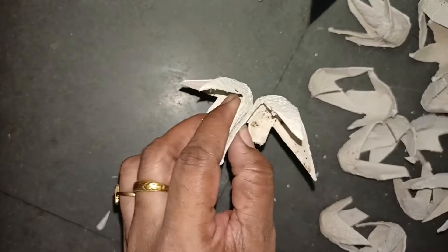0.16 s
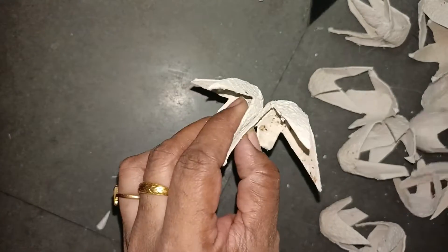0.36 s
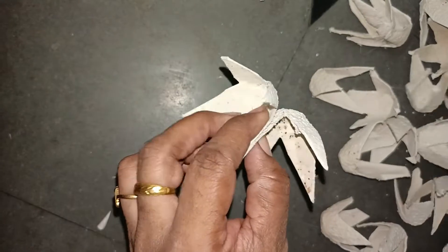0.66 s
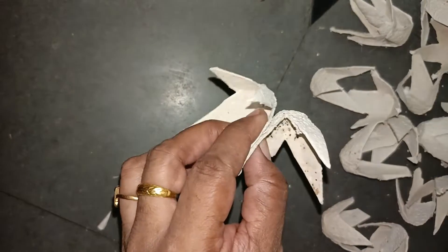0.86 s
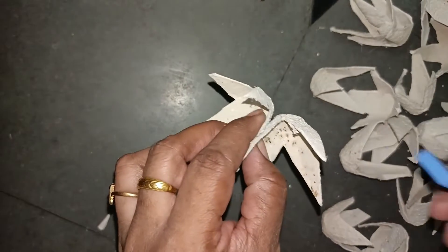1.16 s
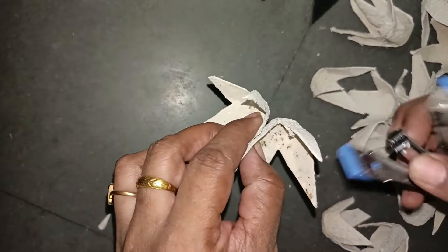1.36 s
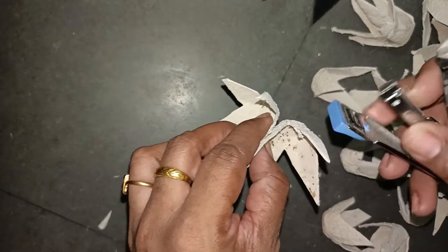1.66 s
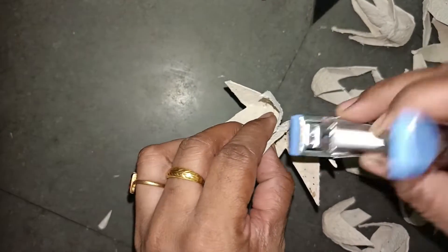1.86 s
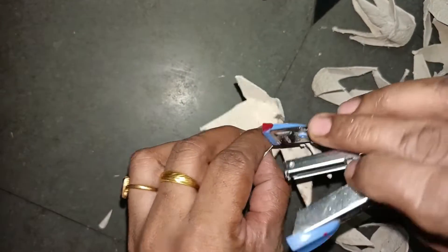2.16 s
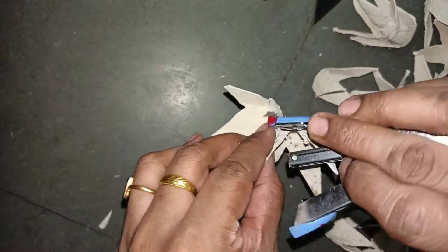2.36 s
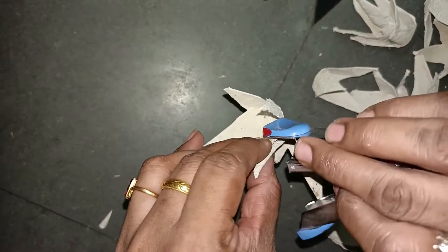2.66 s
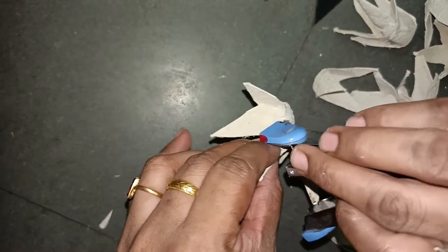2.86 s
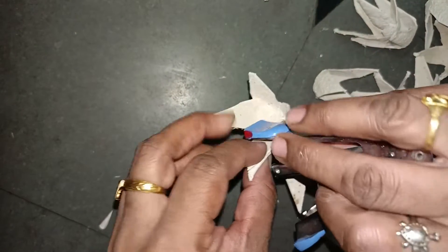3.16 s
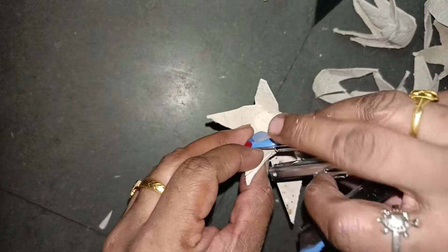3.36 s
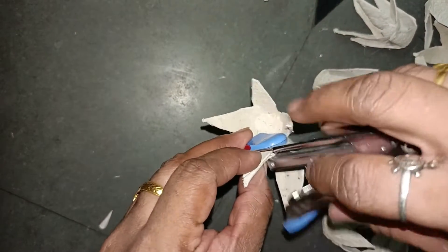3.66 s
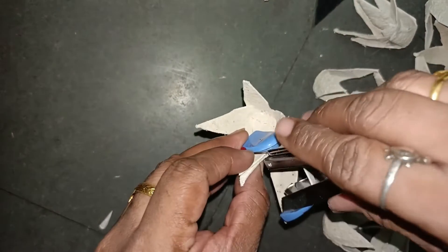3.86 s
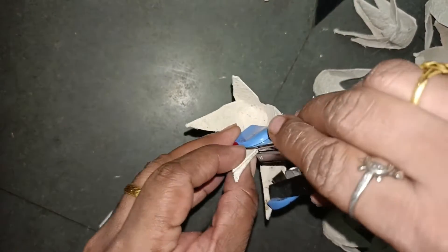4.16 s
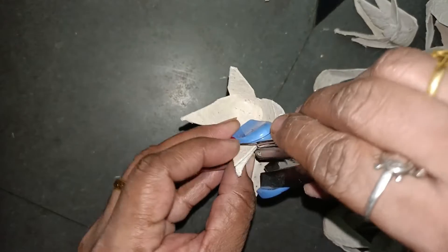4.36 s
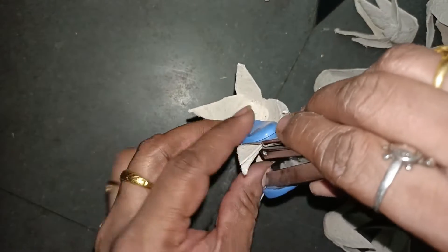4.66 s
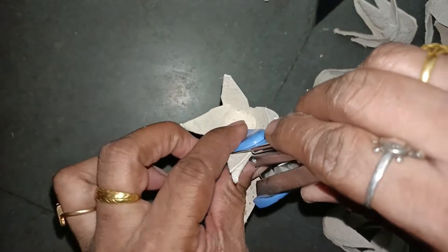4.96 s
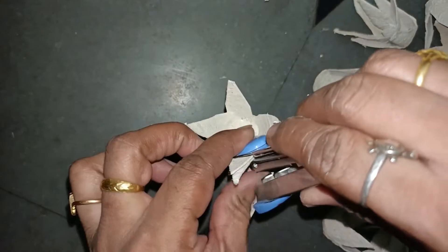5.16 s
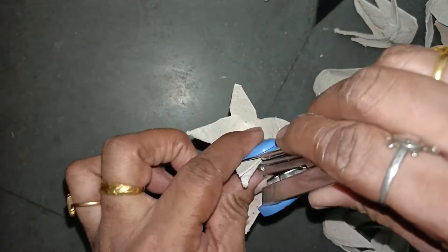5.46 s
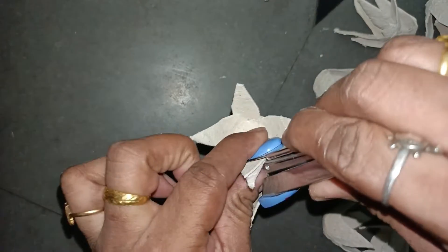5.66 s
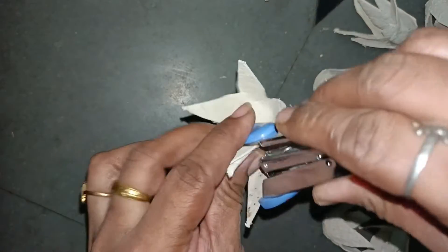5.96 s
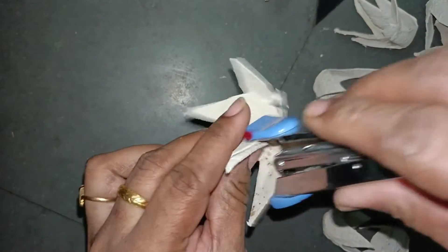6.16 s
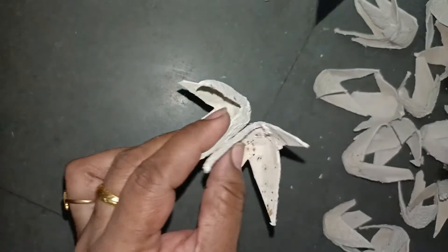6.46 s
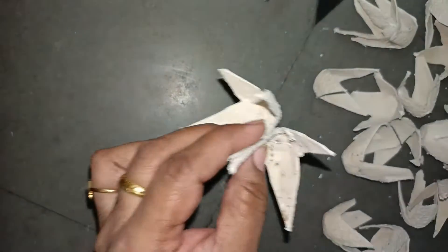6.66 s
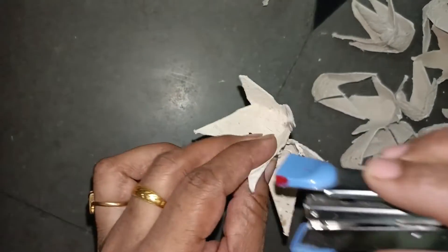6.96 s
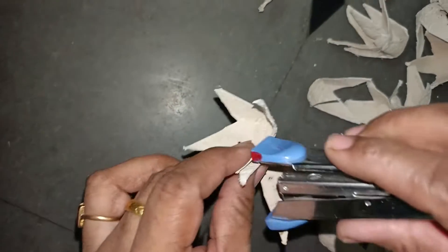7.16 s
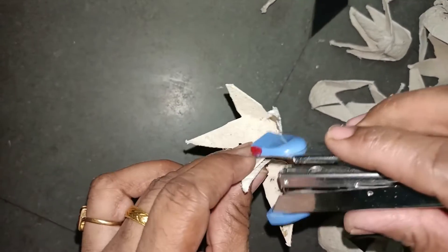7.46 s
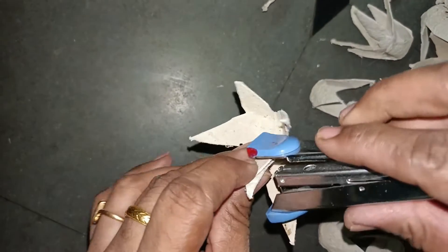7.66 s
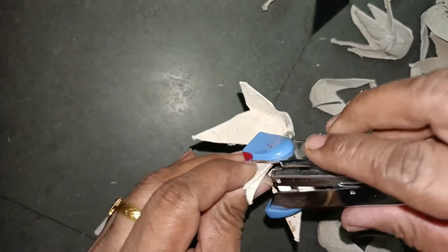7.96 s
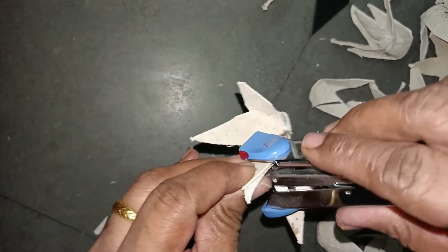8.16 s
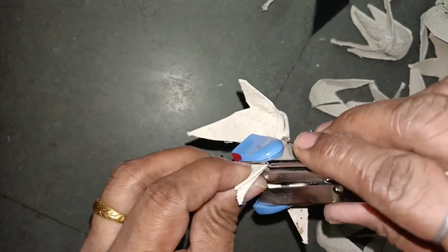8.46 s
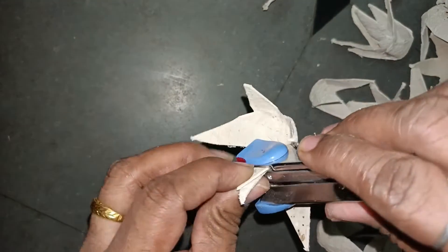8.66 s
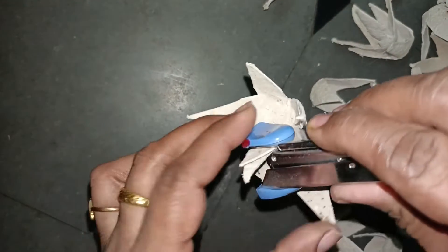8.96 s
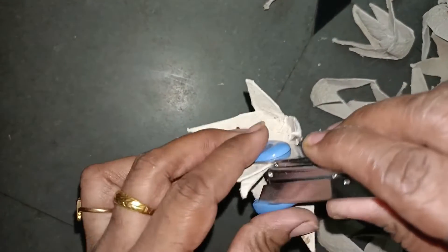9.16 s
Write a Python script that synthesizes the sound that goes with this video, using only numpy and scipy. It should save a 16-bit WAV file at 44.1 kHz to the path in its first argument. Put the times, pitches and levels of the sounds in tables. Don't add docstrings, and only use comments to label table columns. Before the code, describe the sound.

Very close to the microphone, fingers rub and bend dry pulp petals with crisp rustles. A small metal stapler is put down with a sharp clack, then picked up, its loose staples rattling. Its jaws scrape and tick on the petals, creak, then snap shut loudly midway. Rustling and small clicks continue to the end. A quiet, slightly reverberant room hums, with a blurred far clock.

```python
import sys
import numpy as np
from scipy import signal
from scipy.io import wavfile

SR = 44100
rng = np.random.default_rng(int(sys.argv[2]) if len(sys.argv) > 2 else 0)


def invert_db(level):
    return 10 ** (np.asarray(level, dtype=float) / 20)


def master_out(mix):
    frames = np.transpose(np.atleast_2d(mix))
    ceiling = np.clip(frames, -1, 1)
    pcm = np.round(ceiling * 32767).astype(np.int16)
    wavfile.write(sys.argv[1], SR, pcm)


N = 410571

# frequency in Hz, width in Hz, level in dB.
SET_DOWN_MODES = [(1232, 51, -22), (4230, 500, -9.5), (5610, 83, -32), (7000, 89, -3), (7900, 83, -18.5),
                  (8580, 170, -13.5), (9130, 370, -25), (10320, 91, -8.5), (12160, 820, -14),
                  (14300, 1200, -8.5)]
TOP_HZ = 15700
PORT_GAIN_DB = 9.5
LEFT_LEAD_S = .0005
APPROACH_S = .0016


def unit(x):
    return x / np.sqrt(np.mean(x ** 2) + 1e-20)


def sides(left_right_db):
    return invert_db(np.reshape([left_right_db, -left_right_db], (2, -1)) / 2)


def band(x, low_hz, high_hz):
    edges_hz = [low_hz, min(high_hz, .45 * SR)]
    return signal.sosfilt(signal.butter(2, edges_hz, "band", fs=SR, output="sos"), x)


def resonate(x, hz, width_hz):
    r = np.exp(-np.pi * width_hz / SR)
    zeros = np.array([1, 0, -1]) * (1 - r * r) / 2
    return signal.lfilter(zeros, [1, -2 * r * np.cos(2 * np.pi * hz / SR), r * r], x)


def drift(rate_hz):
    r = np.exp(-64 * np.pi * rate_hz / SR)
    slow = signal.lfilter([1], [1, -2 * r, r * r], rng.standard_normal(N // 32 + 2002))[2000:]
    return np.interp(np.arange(N) / 32, np.arange(len(slow)), unit(slow))


def two_paths(size, alike):
    shared = rng.standard_normal(size + 64)
    own = rng.standard_normal((2, size))
    lead = int(LEFT_LEAD_S * SR)
    common = np.array([shared[lead:lead + size], shared[:size]])
    return np.sqrt(alike) * common + np.sqrt(1 - alike) * own


def three_parts(noise, gains):
    out = 0
    for gain, (low, high) in zip(gains, [(2400, 5400), (4900, 11320), (11000, 57000)]):
        part = band(noise * gain + 1e-18, low, high)
        part = band(part, 0.87 * low, 0.8 * high)
        out = out + part * np.sqrt(SR / 2 / (min(high, TOP_HZ) - low))
    return out


def burst(rise_s, t60, size):
    t = np.arange(size) / SR
    return np.minimum(t / rise_s, 1) ** 2 * invert_db(-60 * np.maximum(t - rise_s, 0) / t60)


def strokes(rows):
    t, power = np.arange(0, N, 16) / SR, 0
    for peak_s, level_db, rise_s, fall_s in rows:
        fallen_db = 20 * np.maximum((peak_s - t) / rise_s, (t - peak_s) / fall_s)
        power = power + invert_db(level_db - fallen_db) ** 2
    return np.interp(np.arange(N) / SR, t, power)


def slides():
    # start in seconds, length in seconds, level in dB, swell over the slide in dB, dull part in dB.
    slide_rows = [(2.207, 0.098, -56.5, -12.5, -18.5), (2.424, .12, -56, 4.5, -19),
                  (3.048, 0.16, -53.5, 1.5, -19.5), (3.352, 0.065, -49.5, -3, -26),
                  (4.568, 0.14, -57.5, -5, -9), (4.68, 0.15, -61, 0, -5.5), (5.124, 0.073, -58, 2, -4.5),
                  (7.142, 0.16, -62, -2, -18.5), (8.139, 0.0715, -55.5, 7.5, -13.5),
                  (4.13, 0.073, -65, -9, -19), (6.058, 0.17, -55, 1, -16), (7.429, 0.12, -67.5, -8.5, -15)]
    edge_s = 0.021
    t, power = np.arange(0, N, 16) / SR, 0
    for start_s, length_s, level_db, swell_db, dull_db in slide_rows:
        gate = np.clip(np.minimum(t - start_s, start_s + length_s - t) / edge_s + .5, 0, 1)
        swell = swell_db * np.clip((t - start_s) / length_s - .5, -1, 1)
        power = power + (gate * invert_db(level_db + swell + np.array([[0], [dull_db]]))) ** 2
    return [np.interp(np.arange(N) / SR, t, p) for p in power]


def patchy(noise, depth_db, rate_hz):
    out = 0
    for k, hz in enumerate(2300 * 2 ** np.arange(0, 3, .2)):
        out = out + (-1) ** k * resonate(noise, hz, .1 * hz) * invert_db(depth_db * drift(rate_hz))
    return unit(out)


def rustle():
    # peak in seconds, level in dB, rise and fall over 20 dB in seconds.
    rub_rows = [(.073, -62, 0.12, 0.27), (.221, -49.5, 0.066, 0.052), (.603, -58.5, 0.05, 0.076),
                (1.6, -65, .02, 0.24), (1.718, -76, 0.31, 0.048), (2.039, -62.5, 0.68, 0.018),
                (2.135, -58.5, 0.023, 0.082), (.72, -60, 0.048, 0.046), (4.885, -63, 0.028, 0.043),
                (2.76, -55.5, 0.049, 0.06), (2.966, -56.5, 0.4, 0.12), (7.6, -69, .03, .15),
                (4.735, -45, 0.037, 0.071), (5.08, -63, 0.11, 0.084), (5.408, -56.5, 0.069, 0.098),
                (5.942, -56, 0.18, 0.076), (6.368, -64.5, 0.043, 0.094), (6.548, -62, 0.14, .08),
                (6.697, -46.5, 0.02, 0.065), (6.997, -55, 0.086, 0.18), (7.721, -58, 0.23, 0.58),
                (8.75, -50.5, 0.12, 0.16), (1.09, -68.5, .1, .08), (8.908, -51.5, 0.055, 0.035),
                (9.277, -55.5, 0.11, 0.16)]
    # peak in seconds, level in dB, rise and fall in seconds.
    drag_rows = [(.5, -58.5, .4, 0.15), (1.2, -72, 0.1, 1), (2.3, -69, .1, 0.29),
                 (3.26, -52.5, 0.037, 0.097), (3.453, -56.5, 0.034, 0.026), (3.696, -70.5, 0.21, 0.041),
                 (4.22, -49.5, 0.036, 0.096), (5.263, -60, 0.05, 0.073), (5.862, -56.5, 0.13, 0.13),
                 (6.171, -55, 0.145, 0.19), (6.79, -56.5, 0.028, 0.052), (7.24, -57.5, 0.11, 0.069),
                 (7.956, -57.5, 0.073, 0.074), (9.028, -63.5, 0.022, 0.26)]
    # time in seconds, level in dB.
    grip_rows = [(0., -59.5), (.75, -70.5), (1., -84), (1.75, -91), (2.6, -101), (3.9, -72), (4.45, -78),
                 (5.6, -80.5), (6.45, -89), (6.9, -66.5), (7.36, -100.5), (7.55, -66), (8.1, -73),
                 (8.27, -64.5), (8.62, -64), (9.31, -68)]
    # time in seconds, left-right difference in dB.
    hands_side = [(0.0, 2.5), (0.67, 4), (0.75, 4), (1.5, 1), (5.65, 1.5), (6.58, 4), (7.31, 3.5),
                  (7.54, 4.5), (9.31, 1)]
    # frequency in Hz, width in Hz, level in dB.
    pinched_petal = [(3770, 82, 6), (5300, 670, -9.5)]

    t = np.arange(N) / SR
    rubs, drags = strokes(rub_rows), strokes(drag_rows)
    grip = invert_db(np.interp(t, *np.transpose(grip_rows))) ** 2
    slid, slid_dull = slides()
    level = np.sqrt(rubs + drags + grip + slid)
    dull = np.sqrt(rubs * invert_db(2 * -17.5) + drags * invert_db(2 * -7) + grip * invert_db(2 * -10.5) + slid_dull)
    bright = np.sqrt(rubs * invert_db(2 * -11.5) + drags * invert_db(2 * -10.5)
                     + grip * invert_db(2 * -7.5) + slid * invert_db(2 * -13.5))

    fibre_snaps = (rng.random(N) < 350. / SR) * invert_db(4.5 * np.minimum(rng.exponential(1, N), 2.2))
    fibres = .8 * signal.lfilter([1], [1, -.94], fibre_snaps)
    grain = unit(invert_db(1.2 * drift(50.0) + 1.57 * drift(25.0)) + fibres)
    grain = grain ** (1 - .6 * grip / level ** 2)
    gain = invert_db(-4.0) * grain * sides(np.interp(t, *np.transpose(hands_side)))
    middle = gain * level / invert_db(PORT_GAIN_DB)

    noise = patchy(two_paths(N, alike=0.057), depth_db=2.5, rate_hz=9.0)
    rubbed = three_parts(noise, [gain * dull, middle, gain * bright])
    under_jaw = rubbed * np.sqrt(slid) / level
    pinched = sum(invert_db(db) * resonate(under_jaw, hz, width) for hz, width, db in pinched_petal)
    stiff_petals = 0.5 * resonate(rubbed, 5500, 1200)
    return pinched + rubbed + stiff_petals


def contact_rows():
    # time in seconds, peak in dB, bright part in dB, left-right in dB.
    rattles = [(0.588, -39.5, -9, -1), (1.1305, -57, -4, 6), (1.1398, -40.5, -12, 10), (1.157, -49, -5, 11),
               (1.197, -50, -4, 10), (1.2086, -42, -18, 12.5), (1.2973, -39.5, -11, 10),
               (1.3294, -28, -10, -2), (1.3448, -28.5, -23, 6.5), (1.409, -36.5, -8, -3),
               (1.4227, -46, -15, 10), (1.458, -47.5, -28, 10), (1.5533, -56, -17, 10),
               (1.6659, -27, -7.5, 6), (1.9898, -37, -5, 5.5), (1.992, -40, -7, 5), (1.668, -30.5, -18, 6),
               (6.8018, -36.5, 1.5, 13)]
    # time in seconds, peak in dB, bright part in dB, left-right in dB.
    ticks = [(2.7396, -38.5, -40, 6.5), (3.1055, -42.5, -20, 2), (3.2668, -37.5, -28, 4),
             (3.345, -42, -29, 7), (3.4321, -30, -13, 2), (3.446, -33.5, -13, 1), (3.4926, -39, -16, 7),
             (3.704, -45, -9, -3), (5.7488, -49, -11, 9), (5.829, -44.5, -18, 1),
             (6.3646, -54.5, -27.5, 17), (7.897, -68, -23, 8), (8.734, -46, -13, -7), (9.0778, -23, -23, 2),
             (9.224, -53, 0, -10), (7.587, -51, -14, 10), (2.345, -55, -12, 13), (0.81, -61, -4, 2),
             (.911, -61.5, -11, 0), (8.326, -50.5, -10, 5), (9.291, -43, 3, -4)]
    # time in seconds, peak in dB, dull part in dB, left-right in dB.
    knocks = [(1.6546, -44, -15, 6), (1.948, -39.5, -9, 7), (1.9615, -39, -4.5, 19), (1.964, -45, -9, 3),
              (2.011, -34, -14, 9), (2.902, -47.5, 2.5, 0), (3.2365, -41.5, -1, -3), (3.363, -43, -3, 4),
              (3.643, -42.5, -2, 0), (4.042, -52.5, -1, 4), (4.2283, -30.5, -8, 1), (4.4642, -50, -15, 4),
              (4.5796, -49.5, -4, 15), (5.3344, -44, -7, 3), (5.386, -46.5, -5, -3), (5.856, -33.5, -5, -2),
              (6.7745, -44.5, -4, 8), (8.591, -38, -4, 3), (8.649, -40.5, -1, 5),
              (8.8925, -41.5, -16.5, 12.5)]
    # time in seconds, peak in dB, dull part in dB, left-right in dB.
    slips = [(0.055, -44, -4.5, 11), (0.401, -43, -1, 8), (2.765, -44, -30, 11), (3.166, -43.5, -6, 2),
             (3.376, -52, -22, 12), (3.674, -41, -1, 0.5), (5.1317, -47, -2, 3), (5.601, -53.5, 0, -3),
             (6.146, -49, 4, 10), (6.696, -52, -3, 13), (6.8661, -44, -16, 5), (6.908, -46, -35, 0),
             (6.9684, -54, -23, -4), (7.153, -47, -27, 7), (7.297, -46, -16, 6), (8.145, -50, -6.5, 4),
             (8.7167, -45, -23, -13), (8.757, -44, -26, -13), (9.259, -38.5, -18, -1)]
    # start in seconds, length in seconds, peak in dB, bright part in dB, left-right in dB.
    chatters = [(.584, .014, -44.5, -8, 0), (1.289, 0.013, -48, -10, 8), (1.325, 0.0045, -56, -12, 0),
                (1.3365, 0.0054, -41, -21, 2), (1.8, 0.018, -58, -10, 13), (6.7815, 0.0092, -45, -18, -5),
                (6.805, 0.011, -40, -3, 8), (9.016, .004, -58, -5.5, -6), (9.0212, .013, -42, -7, 7),
                (9.041, .006, -49, -8, 1), (9.065, .013, -46, -17, 5), (3.7, 0.014, -43, -11, 1),
                (8.882, .022, -48, -10, 6), (3.385, 0.0086, -41.5, -27, 7), (1.996, 0.0065, -50, -4, 5),
                (8.737, 0.0078, -53, -10, -5), (4.806, 0.012, -53, -17, 5), (6.683, 0.0082, -60, -16, 13),
                (3.151, 0.017, -47, -23, 5), (3.1, 0.0051, -50, -15, 3)]
    # time in seconds, peak in dB.
    creaks = [(4.879, -53), (4.886, -58), (4.9305, -52), (4.942, -51), (4.947, -55), (4.956, -54),
              (4.964, -50.5), (4.975, -54), (4.994, -50), (5.002, -56), (5.048, -57)]

    rows = [(s, db, -21, bright, pan, 0.022, 0) for s, db, bright, pan in rattles]
    rows += [(s, db, -14.5, bright, pan, 0.022, 0) for s, db, bright, pan in ticks]
    rows += [(s, db, dull, -13, pan, 0.02, 0) for s, db, dull, pan in knocks]
    rows += [(s, db, dull, -12.5, pan, 0.048, 0) for s, db, dull, pan in slips]
    rows += [(s - APPROACH_S, db, -19, bright, pan, .018, hold_s) for s, hold_s, db, bright, pan in chatters]
    rows += [(s - APPROACH_S, db, -12, -10., 0, .018, 0) for s, db in creaks]
    return sorted(rows)


def touch(rise_s, hold_s, t60):
    approach_db, sag_db_per_s = -20.5, 252
    t = np.arange(2000) / SR - APPROACH_S
    onset = np.where(t < 0, invert_db(approach_db), np.clip(t / rise_s, invert_db(approach_db), 1) ** 2)
    decay_db = -60 * np.maximum(t - rise_s - hold_s, 0) / t60
    return onset * invert_db(decay_db - sag_db_per_s * np.clip(t, 0, hold_s))


def clicks():
    gains = np.zeros((3, 2, N + 2000))
    noise = two_paths(N, alike=0.054)
    rows = contact_rows()
    fade_speed = np.array([1, 1, 1.8])[:, None, None]
    for s, peak_db, dull_db, bright_db, pan_db, t60, hold_s in rows:
        rise_s = .0002 + .25 * max(t60 - .022, 0)
        shape = touch(rise_s, hold_s, t60) ** fade_speed
        part_db = np.array([dull_db, -PORT_GAIN_DB, bright_db])[:, None, None]
        i = round(s * SR)
        gains[:, :, i:i + 2000] += shape * invert_db(peak_db - 4.5 + part_db) * sides(pan_db)
        strike = i + round((APPROACH_S + rise_s) * SR)
        noise[[0, 1], strike + np.array([0, round(LEFT_LEAD_S * SR)])] = invert_db(11.5)
    contact = three_parts(noise, gains[:, :, :N])

    latest = np.searchsorted([row[0] * SR for row in rows], np.arange(N)) - 1
    favour = invert_db(3. * rng.standard_normal((len(rows), len(SET_DOWN_MODES))))
    steel = 0
    for k, (hz, width_hz, _) in enumerate(SET_DOWN_MODES):
        width_hz = max(width_hz, .07 * hz, 350)
        steel = steel + (-1) ** k * resonate(contact * favour[latest, k], hz, width_hz)
    thud = band(rng.standard_normal(N) * gains[0, :, :N] + 1e-18, 300, 2200)
    return invert_db(-16.0) * contact + invert_db(0.5) * steel + invert_db(-8) * thud


def snaps(damping):
    # time in seconds, peak in dB, left-right in dB, build-up in seconds, burst t60 in seconds.
    snap_rows = [
        (0.3262, -21.5, 2, 0.0004, 0.027),
        (5.473, -28.5, 26, 0.0025, 0.0081),
        (5.475, -20, 4, 0.001, 0.013),
        (5.4766, -16.5, -2, 0.0014, 0.014),
    ]
    # frequency in Hz, width in Hz, level in dB.
    punch_modes = [(378, 400, -19), (1450, 400, -20), (3130, 470, -9), (5150, 570, -12.5),
                   (6520, 140, -15.5), (7660, 200, -17), (8600, 100, -26), (10090, 130, -5.5),
                   (11600, 540, -18), (14900, 2100, -17)]
    out = np.zeros((2, N))
    for row, modes in zip(snap_rows, [SET_DOWN_MODES] + 3 * [punch_modes]):
        s, peak_db, pan_db, rise_s, t60 = row
        envelope = burst(rise_s, t60, size=6000)
        blows = [two_paths(6000, alike=0.43) * envelope + 1e-18 for _ in range(11)]
        sound = invert_db(-12) * band(blows[-1], 1500, 19000)
        for blow, (hz, width_hz, db) in zip(blows, modes):
            width_hz = damping * max(width_hz, 0.045 * hz)
            sound += invert_db(db + 13) * resonate(blow, hz, width_hz) / np.sqrt(damping)
        i = round(s * SR)
        out[:, i:i + 6000] += sound * invert_db(peak_db) * sides(pan_db)
    return out


def room(x):
    # delay in seconds, level in dB.
    wall_echoes = [(.017, -0.5), (0.036, 6)]
    t60 = 0.37
    t = np.arange(round(.6 * SR)) / SR
    noise = rng.standard_normal((2, len(t))) * (t > .014)
    dull = signal.sosfilt(signal.butter(1, 10000, fs=SR, output="sos"), noise)
    tail = dull * invert_db(-60 * t / t60) + (noise - dull) * invert_db(-60 * t / (.6 * t60))
    tail = tail + 0.6 * resonate(tail, 2800, 1200)
    tail = tail * invert_db(sum(db * np.exp(-((t - s) / 0.0015) ** 2) for s, db in wall_echoes))
    tail /= np.sqrt(np.sum(tail ** 2, axis=1, keepdims=True))
    return invert_db(-18) * signal.fftconvolve(x, tail, axes=1)[:, :N]


def clock():
    # frequency in Hz, width in Hz, level in dB.
    clock_case = [(650, 84, 5), (890, 95, 3), (1500, 350, -1.5), (2000, 180, 1), (2330, 97, -5),
                  (3840, 200, -5)]
    first_s, t60 = 0.241, 0.45
    since = (np.arange(N) / SR - first_s) % 1.0
    blur = (1 - np.exp(-since / .012)) * invert_db(-60 * since / t60)
    noise = band(rng.standard_normal((2, N)), 400, 3500)
    case = sum(invert_db(db) * resonate(noise, hz, width) for hz, width, db in clock_case)
    return invert_db(-61.5) * blur * unit(case)


def elsewhere():
    # time in seconds, frequency in Hz, level in dB, t60 in seconds.
    far_sounds = [
        (.40, 890, -68.5, 0.46),
        (.56, 1500, -72.5, 0.46),
        (2.08, 1450, -77.5, 0.83),
        (2.07, 1770, -79, 0.72),
        (4.75, 650, -76, 1.0),
        (7.70, 208, -64.5, 0.27),
        (8.86, 126, -56.5, 0.33),
    ]
    size = 30000
    out = np.zeros((2, N + size))
    for s, hz, level_db, t60 in far_sounds:
        ring = resonate(rng.standard_normal(size), hz, 0.18 * hz)
        ring = unit(resonate(ring, hz, 0.18 * hz))
        i = round(s * SR)
        out[:, i:i + size] += invert_db(level_db) * ring * burst(0.0053, t60, size)
    return out[:, :N]


def at_hz(points, hz):
    points_hz, values = np.transpose(points)
    return np.interp(np.log(hz), np.log(points_hz), values)


def air():
    # frequency in Hz, density in dB per Hz.
    air_density = [(30, -43.5), (55, -12), (120, 5), (250, -1), (500, -4), (900, -4), (1500, -9),
                   (3000, -17.5), (5000, -24), (8000, -32), (12000, -34.5), (16500, -25.5)]
    # frequency in Hz, left-right likeness from -1 to 1.
    likeness = [(60, -0.1), (180, 0.93), (550, -0.33), (1650, -0.19), (4970, -0.077), (15000, -0.1)]
    # frequency in Hz, width in Hz, level in dB, left-right in dB.
    hum = [(60, 2.6, -85, 2), (113, 18, -80, -1), (306.2, 5.7, -83, -0.5), (319.3, 6.1, -83.5, -11.5),
           (414, 2.9, -94, -14), (822, 7.2, -91, 2.5), (928, 4.5, -89.5, 3)]
    out = 0
    edges_hz = 28 * 2 ** np.arange(0, 9.6, .5)
    white = rng.standard_normal((2, 2, N))
    for k, (low, high) in enumerate(zip(edges_hz, edges_hz[1:])):
        centre_hz = np.sqrt(low * high)
        mid, side = band(white[k % 2], low, high)
        alike = np.clip(at_hz(likeness, centre_hz), -1, 1)
        ports = np.sqrt(1 + alike) * mid + np.sqrt(1 - alike) * side * [[1], [-1]]
        out = out + invert_db(at_hz(air_density, centre_hz) + 1.9 * drift(0.88)) * ports
    out = invert_db(-71) * unit(out)
    white = rng.standard_normal(N)
    for hz, width_hz, level_db, pan_db in hum:
        out += unit(resonate(white, hz, width_hz)) * invert_db(level_db + 2.6 * drift(2.3)) * sides(pan_db)
    return out


def scene():
    contacts = clicks()
    all_round = contacts + snaps(damping=3.5)
    stapler = contacts + snaps(damping=0.49)
    return stapler + room(all_round) + rustle() + clock() + air() + elsewhere()


def top_cut(x):
    return signal.sosfilt(signal.butter(12, 16640, fs=SR, output="sos"), x)


def record(dry):
    # frequency in Hz, width in Hz, level in dB.
    port_modes = [
        [(8250, 1240, 16.5), (4880, 300, 1.5)],
        [(9250, 920, 17.5), (5490, 1000, -4.5)],
    ]
    heard = []
    for x, modes in zip(dry, port_modes):
        heard.append(x + sum((invert_db(db) - 1) * resonate(x, hz, width) for hz, width, db in modes))
    heard = .6 * np.tanh(np.array(heard) / .6)
    low_pass = signal.cheby2(16, 30, TOP_HZ + 150, fs=SR, output="sos")
    below = signal.sosfiltfilt(low_pass, heard)
    return top_cut(below + invert_db(-30) * (heard - below))


dry = scene()
out = record(dry)
master_out(out)
```